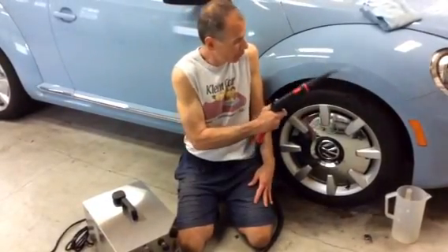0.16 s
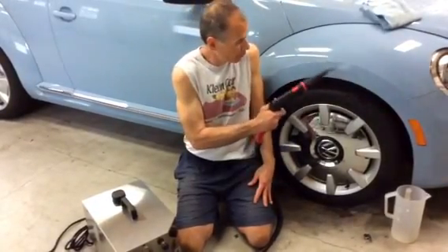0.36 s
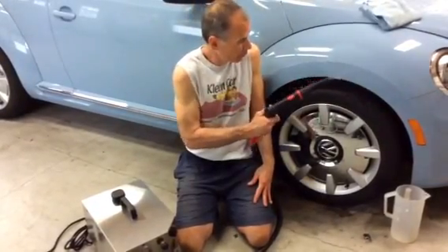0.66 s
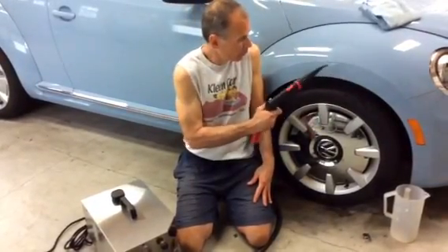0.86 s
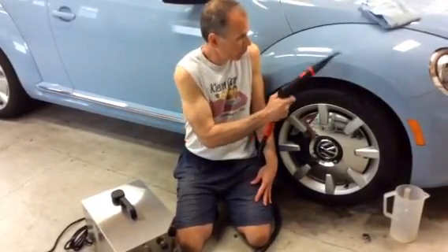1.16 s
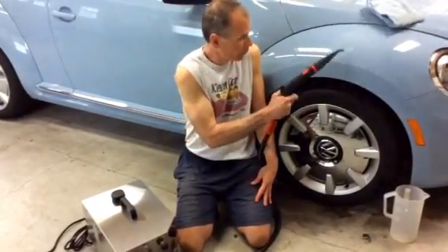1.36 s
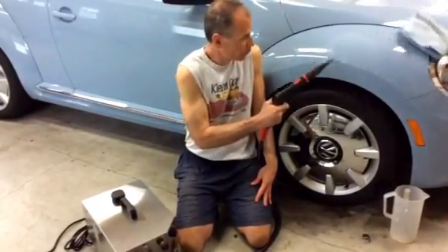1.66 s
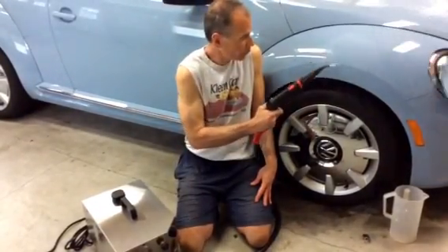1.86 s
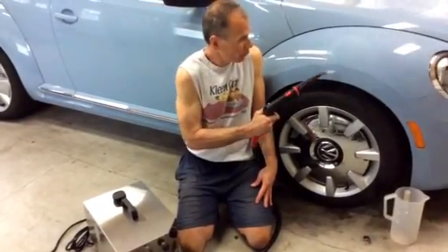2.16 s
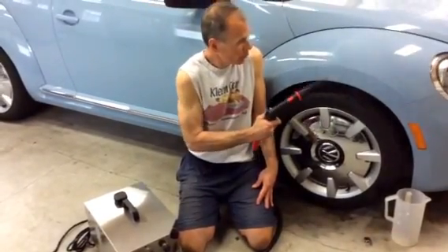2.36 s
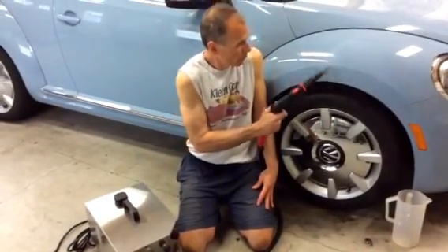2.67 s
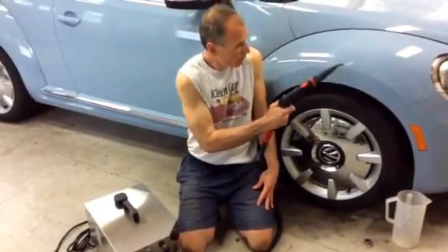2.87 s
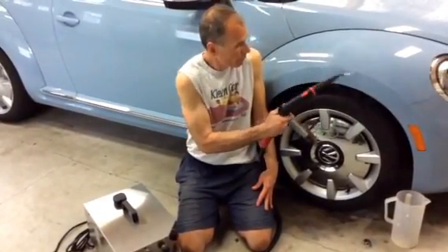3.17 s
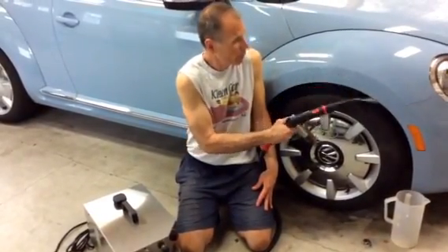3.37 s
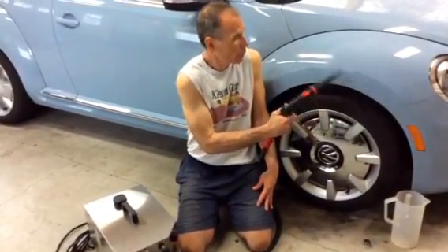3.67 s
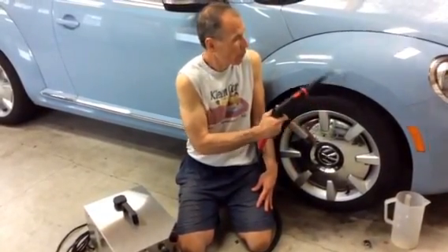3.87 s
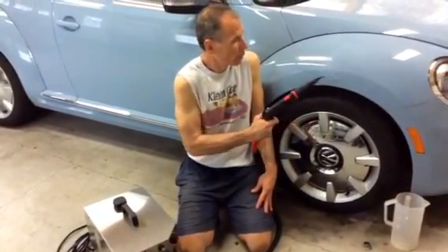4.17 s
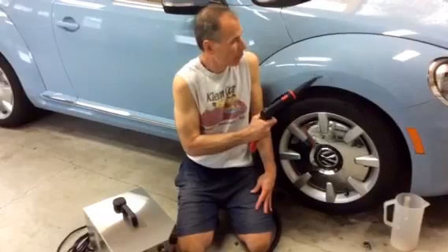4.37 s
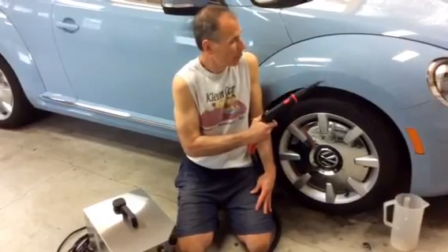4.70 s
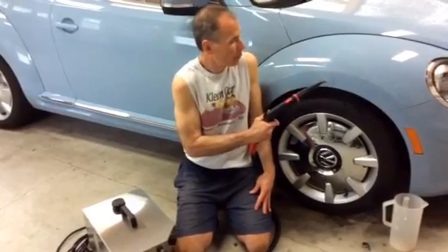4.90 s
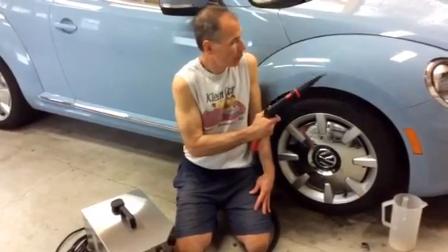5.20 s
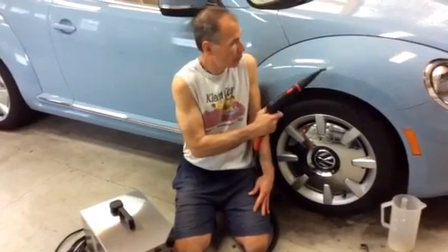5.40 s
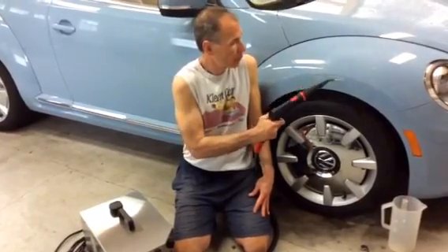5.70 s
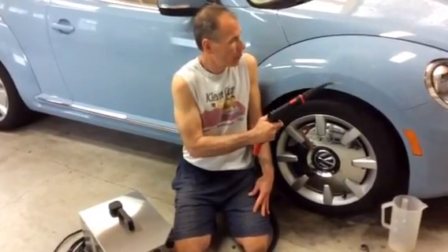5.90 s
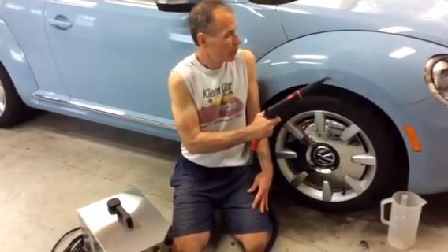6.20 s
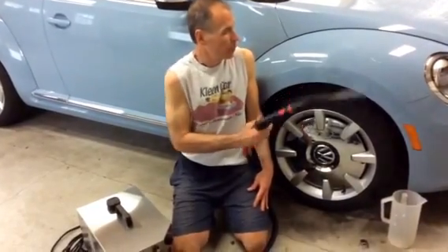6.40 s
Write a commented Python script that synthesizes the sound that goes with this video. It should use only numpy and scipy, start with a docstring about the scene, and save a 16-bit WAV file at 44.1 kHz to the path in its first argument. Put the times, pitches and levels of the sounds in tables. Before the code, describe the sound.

Continuous airy steam hiss, strongest in the treble, with a thinner roar beneath and slight fluttering sputter. It begins a little restrained, grows stronger around two seconds, then surges and dips irregularly. Draught buffets the close microphone with dull flutters and sharp low pops, sparse early and dense later. Small hard indoor workshop, short dull echoes, both channels alike; the jet is still hissing at the end.

```python
"""Steam wand in a workshop

A steam wand is waved over a car wing, and its jet hisses: noise in many bands that swells and ducks.
Some narrow bands stand out in the steam, near echoes add faint ripples, and the walls add a dull tail.
Its draught buffets the microphone: random small pressure jumps swell in gusts, and bigger ones stand out.
A quiet room tone lies underneath; both channels are alike."""
import sys
import numpy as np
from scipy import signal
from scipy.fft import rfft, irfft
from scipy.io import wavfile
from scipy.ndimage import map_coordinates

SR = 44100
rng = np.random.default_rng(int(sys.argv[2]) if len(sys.argv) > 2 else 0)


def to_wav(sig):
    """Store sig (one row per channel, or 1-D mono) as 16-bit WAV at the path in sys.argv[1].

    Samples outside -1..1 are clipped; the rate is SR.
    """
    pcm = np.clip(np.atleast_2d(sig), -1, 1) * 32767
    pcm = np.round(pcm).astype(np.int16)
    wavfile.write(sys.argv[1], SR, pcm.T)  # frames by channels


N = 288810

# Tone colour of the room's background noise: (f/Hz, relative level per Hz/dB)
ROOM_COLOUR = [(21, -42), (35, -27), (162, -14), (267, -10), (446, -11), (600, -18), (780, -29),
               (1320, -120)]
ROOM_TONE_DB = -66

# Walls: time for the echo to fade by 60 dB, and where its treble starts to fade
ECHO_FADE_S, WALL_CUT_HZ = 0.3, 2440
WALL_ECHO_DB = -12

# Changing draught on the microphone port beneath the gusts: (t/s, rumble level/dB)
DRAUGHT = [(0, -53), (0.18, -70), (0.45, -68), (0.85, -59), (1.07, -74), (1.28, -70), (1.38, -55),
           (1.85, -59.5), (1.97, -62), (2.3, -50), (2.9, -60), (3.1, -52.5), (3.45, -56), (3.7, -57),
           (4.0, -55), (4.12, -45), (4.45, -48), (4.7, -41), (5.28, -48), (5.38, -68), (5.48, -54),
           (5.68, -57), (6.0, -48), (6.4, -53), (6.55, -46)]
# Gusts on the port: (start t/s, held t/s, rumble level/dB)
GUSTS = [(0.52, 0.018, -56), (0.68, 0.028, -57), (0.77, 0.046, -50), (0.97, .03, -57), (1.7, 0.027, -48),
         (2.07, 0.065, -42), (2.3, .03, -43), (2.39, .36, -37), (2.86, .02, -50), (3.172, .012, -45.5),
         (3.235, 0.022, -44), (3.447, .015, -45), (3.51, 0.068, -37), (3.745, 0.024, -40),
         (3.845, 0.026, -39.5), (4.14, .09, -35.5), (4.295, .015, -40), (4.355, 0.065, -36.5),
         (4.56, .13, -39), (4.74, .11, -35.5), (4.94, 0.064, -34), (5.06, 0.025, -37.5),
         (5.185, .09, -40.5), (5.73, 0.068, -39.5), (5.85, .14, -35), (6.045, 0.066, -36),
         (6.16, 0.051, -38.5), (6.285, 0.058, -37.5), (6.485, 0.025, -40)]
GUST_RISE_DB_PER_S, GUST_FALL_DB_PER_S = 600, 600
# Pressure jumps that stand out, before the port leak:
# (t/s, peak level/dB, push +1 or pull -1, fade time constant/ms)
POPS = [(2.0999, -26, 1, 1.0), (2.3095, -20.5, 1, 2.2), (2.4508, -21, -1, 1.0), (2.456, -22.5, 1, 2.0),
        (2.5067, -22.5, 1, 1), (2.5653, -21, -1, 2.9), (2.638, -25, 1, 1.81), (2.728, -25, 1, 2.2),
        (2.737, -27, 1, 1.1), (3.176, -29, 1, 0.96), (3.243, -25.5, 1, 0.86), (3.2516, -29, 1, 0.6),
        (3.453, -32, 1, 1.1), (3.523, -23.5, 1, 0.39), (3.748, -22.5, 1, 1.8), (4.1454, -27, 1, 2),
        (4.1868, -14, 1, 1.3), (4.206, -22, -1, 0.69), (4.2969, -14, -1, 1.4), (4.301, -19, 1, 1.2),
        (4.385, -14, 1, 0.71), (4.3932, -23, -1, 1.1), (4.56, -26, 1, 0.67), (4.8032, -20, -1, 1.0),
        (4.8124, -18, 1, 1.4), (4.8267, -19, 1, 1.3), (4.844, -12, -1, 1.6), (4.8489, -13, 1, 0.94),
        (4.9487, -25, 1, 1.1), (4.9596, -19, 1, 1.7), (5.0731, -15, 1, 0.7), (5.084, -20.5, 1, 1.4),
        (5.1876, -28, 1, 0.65), (5.248, -21.5, -1, 1.8), (5.733, -23, -1, 0.9), (5.883, -20, -1, 1.1),
        (5.909, -17, 1, 1.1), (5.918, -21, 1, 1.5), (5.9244, -11.5, -1, 0.71), (5.949, -18, 1, 0.84),
        (5.964, -16, 1, 1.7), (5.984, -24, -1, 1.2), (6.0923, -20, 1, 1.4), (6.213, -21, 1, 0.81),
        (6.3197, -16, 1, 0.94), (6.3325, -21, 1, 1.1)]
# Small eddies: number per second over all sizes, strength spread, fade time constants of three sizes
EDDIES_PER_S, EDDY_SPREAD_DB, EDDY_FADES_MS = 260, 3, (0.88, 1.23, 3.1)
RISE_SHARE = 0.13    # rise time constant of a jump, as a share of its fade
PORT_LEAK_HZ = 56.6

# Slow swell of the steam: (t/s, hiss level/dB, roar level/dB, body level/dB)
JET_SWELL = [(0.0, -27, -38.5, -51), (0.3, -27, -34.5, -49), (0.85, -23.5, -33.5, -48.5),
             (0.98, -26, -33.5, -50.5), (1.2, -26.5, -33.5, -47), (1.42, -27, -35, -49),
             (1.58, -24.5, -33, -47), (1.7, -26, -34, -50.5), (1.88, -25, -32.5, -45.5),
             (2.13, -21.5, -31, -46), (2.45, -21, -31.5, -47.5), (2.73, -23, -33, -49.5),
             (3.05, -27.5, -34, -46.5), (3.2, -23, -31, -48), (3.45, -23, -31.5, -43),
             (3.72, -23.5, -32.5, -50), (3.88, -20.5, -30.5, -44.5), (4.18, -21.5, -31, -46),
             (4.5, -24, -35, -50.5), (4.62, -21, -31.5, -46.5), (4.81, -20, -30.5, -44),
             (4.9, -23.5, -33.5, -49.5), (5.09, -21.5, -34, -49.5), (5.5, -24.5, -35, -43.5),
             (5.76, -20.5, -30.5, -45.5), (6.05, -22.5, -33.5, -49.5), (6.55, -25, -36, -50)]
# Tone colour of the steam before its bands are levelled: (f/Hz, relative level per Hz/dB)
JET_COLOUR = [(210, -35), (350, -25), (430, -17.5), (565, -23.5), (750, -18), (1000, -15.5), (1400, -16),
              (2160, -12.5), (2680, -10), (4540, -3.5), (7800, 0), (10200, -2), (12200, -4), (15400, -7.5)]
# Borders between the four parts of the jet: body, roar, hiss and sizzle
BODY_TOP_HZ, ROAR_TOP_HZ, SIZZLE_FROM_HZ = 1900, 4200, 10000
# Sizzle: level against the mean hiss, and share of the hiss's slow swing
SIZZLE_UNDER_DB, SIZZLE_FOLLOWS = -5, 0.62
# Narrow bands that stand out in the steam, the lower ones like the ripple of a floor echo:
# (f/Hz, width f/Hz, boost level/dB)
STANDOUT_BANDS = [(1208, 25, 7), (1340, 40, 4), (1593, 50, 6), (1696, 18, 6), (1778, 18, 6), (2031, 50, 3),
                  (2207, 30, 6), (2407, 27, 4), (2960, 43, 4), (5170, 50, 2), (6288, 80, 3), (7720, 700, 2),
                  (9400, 350, 3)]
# The nozzle flicks away, with the full depth in the hiss:
# (start t/s, held t/s, climb t/s, depth level/dB)
FLICKS = [(1.865, .02, 0.059, 6), (2.142, 0.036, 0.078, 11.5), (3.255, 0.0092, 0.032, 4.5),
          (3.59, 0.0087, .06, 4.5), (3.88, .025, 0.16, 12), (5.515, .02, 0.13, 9.5)]
FLICK_FALL_S, SIZZLE_LATE_S, SIZZLE_CLIMB_MORE_S = 0.031, 0.011, 0.032
FLICK_ROAR_SHARE, FLICK_SIZZLE_SHARE, FLICK_DRAUGHT_SHARE = 0.37, 0.99, 0.8
FLICK_SWELL_DB, FLICK_SWELL_FADE_S = 2, 0.1    # roar and body swell as the treble climbs back
# The steam slackens (+) or surges (-) for a moment; hiss and sizzle take a share of the roar depth:
# (start t/s, held t/s, roar depth level/dB, body depth level/dB)
LULLS = [(0.035, .01, -3, 0), (0.13, 0.027, 3, 9), (0.21, .01, -2.5, -1), (0.475, 0.0087, -3, 0.5),
         (0.84, 0.0085, -2.5, -4.5), (2.02, .01, 0.5, -0.5), (2.74, 0.062, 4, 4), (2.86, 0.021, 2.5, 0),
         (2.97, 0.045, -4.5, -1), (3.5, 0.015, -1.5, -3.5), (5.1, 0.038, 4.5, 4), (5.22, .02, 0, 7),
         (5.3, 0.053, 5.5, 9), (5.42, .01, -1, 6.5), (5.99, 0.0085, 1, 0), (6.22, 0.014, 3, 10),
         (6.35, 0.072, 1.5, 3), (6.45, 0.018, -1.5, -0.5)]
LULL_FALL_S, LULL_RISE_S = 0.037, 0.067
LULL_HISS_SHARE, LULL_SIZZLE_SHARE = 0.78, 0.24
# Near echoes off wing and floor, sliding as the wand is waved:
# (mean delay t/ms, sway t/ms, sway rate f/Hz, level/dB)
BOUNCES = [(1.301, 0.14, 1.48, -15), (5.201, 0.078, 1.77, -15)]

# Narrow dips in the microphone's treble: (f/Hz, width f/Hz, change level/dB)
MIC_DIPS = [(6900, 450, -2), (8900, 400, -2), (11400, 350, -4), (13480, 300, -6), (14550, 500, -4)]
MIC_LOW_HZ, MIC_TOP_HZ = 35.2, 15290


def from_db(db):
    """Turn decibels into a gain."""
    return 10 ** (np.asarray(db) / 20)


def rms_one(x):
    """Scale a sound so that its average strength (rms) is 1."""
    return x / np.sqrt(np.mean(x ** 2) + 1e-20)


def in_time(rows):
    """Draw straight lines between the table's rows: one curve over all samples for each column."""
    s, *columns = np.transpose(rows)
    return [np.interp(np.arange(N) / SR, s, column) for column in columns]


def drift(rate):
    """Wander at random around 0 with spread 1, about rate turns a second."""
    # Worked out at every 20th sample; the first 4000 values let the filter settle
    r = np.exp(-np.pi * rate * 20 * 2 / SR)
    noise = rng.standard_normal(N // 20 + 4002)
    slow = signal.lfilter([1], [1, -2 * r, r * r], noise)[4000:]
    return np.interp(np.arange(N) / 20, np.arange(len(slow)), rms_one(slow))


def dips(s, fall_s, held_s, climb_s, db):
    """Add up brief losses in dB: each falls, is held, then climbs back."""
    t = np.arange(N) / SR
    total = np.zeros(N)
    for *times, depth in np.broadcast(s, fall_s, held_s, climb_s, db):
        total += np.interp(t, np.cumsum(times), [0, depth, depth, 0])
    return total


def coloured(spectrum):
    """Make steady noise whose strength at each pitch follows the table."""
    hz, db = np.transpose(spectrum)
    grid = np.arange(1, N // 2 + 2) * SR / N
    gain = from_db(np.interp(np.log(grid), np.log(hz), db))
    return irfft(rfft(rng.standard_normal(N)) * gain, N)


def band(x, low_hz, high_hz):
    """Keep mainly the sound between two frequencies."""
    return signal.sosfilt(signal.butter(2, [low_hz, high_hz], "band", fs=SR, output="sos"), x)


def high_pass(x, hz):
    """Weaken the bass below a frequency."""
    return signal.sosfilt(signal.butter(2, hz, "high", fs=SR, output="sos"), x)


def boost(x, hz, width_hz, db):
    """Lift or dent a narrow band by adding or taking away what a resonator rings with."""
    r = np.exp(-np.pi * width_hz / SR)
    feed = (1 - r * r) / 2 * np.array([1, 0, -1])
    ring = [1, -2 * r * np.cos(2 * np.pi * hz / SR), r * r]
    return x + (from_db(db) - 1) * signal.lfilter(feed, ring, x)


def room_tone():
    """Steady coloured noise as the quiet background of the room."""
    return from_db(ROOM_TONE_DB) * rms_one(coloured(ROOM_COLOUR))


def wall_echoes(x, waves_per_s):
    """Dense dull echoes from walls and cars; the wand is waved between two spots with their own echoes."""
    t = np.arange(SR) / SR
    fade = from_db(-60 * t / ECHO_FADE_S)
    tails = rng.standard_normal((2, SR)) * fade * (t > 0.008)    # the first echo needs time to return
    tails = signal.sosfilt(signal.butter(1, WALL_CUT_HZ, fs=SR, output="sos"), tails)
    spot = np.pi / 2 * drift(waves_per_s)
    sent = x * np.stack([np.cos(spot), np.sin(spot)])
    echoes = np.zeros(N)
    for part, tail in zip(sent, tails):
        echoes += signal.fftconvolve(part, tail / np.linalg.norm(tail))[:N]
    return echoes


def jump(clicks, fade_ms):
    """Turn clicks into pressure jumps: a quick rise, then the pressure bleeds away; height near 1."""
    t = np.arange(round(0.02 * SR)) / SR / (fade_ms / 1000)
    shape = np.exp(-t) - np.exp(-t / RISE_SHARE)
    return signal.fftconvolve(clicks, shape / shape.max())[:len(clicks)]


def draught_level():
    """Rumble level in dB: gusts rise out of the draught, hold and sink back; flicks take air away."""
    t = np.arange(N) / SR
    level_db, = in_time(DRAUGHT)
    for s, held, db in GUSTS:
        before = GUST_RISE_DB_PER_S * np.maximum(s - t, 0)
        after = GUST_FALL_DB_PER_S * np.maximum(t - s - held, 0)
        level_db = np.maximum(level_db, db - before - after)
    s, held, climb, db = np.transpose(FLICKS)
    return level_db - FLICK_DRAUGHT_SHARE * dips(s, FLICK_FALL_S, held, climb, db)


def eddies():
    """Eddies of three sizes cross the port at random, each a small push or pull."""
    strength = from_db(EDDY_SPREAD_DB * np.minimum(rng.exponential(1, N), 3))
    pushes = strength * rng.choice([-1, 1], N)
    born = rng.random(N) < EDDIES_PER_S / SR
    size = rng.integers(0, 3, N)
    return sum(jump(pushes * born * (size == k), ms) for k, ms in enumerate(EDDY_FADES_MS))


def pops():
    """Bigger pressure jumps at set moments."""
    out = np.zeros(N)
    click = np.eye(1, 900)[0]    # a single 1, then silence
    for s, db, push, ms in POPS:
        at = round(s * SR)
        out[at:at + 900] += push * from_db(db) * jump(click, ms)
    return out


def buffeting(lumpy_db):
    """Moving air presses on the port as eddies and pops; a leak drains the steady pressure."""
    rumble = rms_one(high_pass(eddies(), PORT_LEAK_HZ))
    level_db = draught_level() + lumpy_db * drift(6.1)
    return from_db(level_db) * rumble + high_pass(pops(), PORT_LEAK_HZ)


def bounced(x):
    """Direct sound plus near echoes; their sliding delays comb the hiss into faint moving ripples."""
    out = x.copy()
    for ms, sway_ms, rate, db in BOUNCES:
        read_at = np.arange(N) - (ms + sway_ms * drift(rate)) * SR / 1000
        out += from_db(db) * map_coordinates(x, [read_at], order=3)
    return out


def steam_levels():
    """Levels in dB of body, roar, hiss and sizzle: the slow swell, shaped by flicks and lulls."""
    hiss_db, roar_db, body_db = in_time(JET_SWELL)
    mean_db = hiss_db.mean()
    sizzle_db = mean_db + SIZZLE_UNDER_DB + SIZZLE_FOLLOWS * (hiss_db - mean_db)

    s, held, climb, db = np.transpose(FLICKS)
    flick = dips(s, FLICK_FALL_S, held, climb, db)
    late_flick = dips(s + SIZZLE_LATE_S, FLICK_FALL_S, held, climb + SIZZLE_CLIMB_MORE_S, db)
    # The same curve shape, added instead of taken away, makes a swell
    swell = dips(s + FLICK_FALL_S, climb, held, FLICK_SWELL_FADE_S, FLICK_SWELL_DB)

    s, held, db, body_depth_db = np.transpose(LULLS)
    lull = dips(s, LULL_FALL_S, held, LULL_RISE_S, db)
    body_lull = dips(s, LULL_FALL_S, held, LULL_RISE_S, body_depth_db)
    return (body_db + swell - body_lull,
            roar_db + swell - lull - FLICK_ROAR_SHARE * flick,
            hiss_db - flick - LULL_HISS_SHARE * lull,
            sizzle_db - FLICK_SIZZLE_SHARE * late_flick - LULL_SIZZLE_SHARE * lull)


def jet(sputter_db, spit_db, patchy_db):
    """Rushing steam as bands of noise; wet steam makes all sputter together, and each flickers alone."""
    noise = [coloured(JET_COLOUR), coloured(JET_COLOUR)]    # neighbouring bands get unrelated noise
    sputter = sputter_db * drift(15.5) + spit_db * drift(260)
    parts = np.zeros((4, N))
    edges = np.geomspace(300, 16500, num=19)    # bands about a third of an octave wide
    for k, (low, high) in enumerate(zip(edges, edges[1:])):
        middle = np.sqrt(low * high)
        part = np.searchsorted([BODY_TOP_HZ, ROAR_TOP_HZ, SIZZLE_FROM_HZ], middle)
        flicker = from_db(sputter + patchy_db * drift(8.1))
        parts[part] += band(noise[k % 2], low, high) * flicker
    steam = sum(from_db(db) * rms_one(part) for part, db in zip(parts, steam_levels()))
    for hz, width_hz, db in STANDOUT_BANDS:
        steam = boost(steam, hz, width_hz, db)
    return steam


def scene():
    """Add room tone, wall echoes, draught and jet, alike in both channels."""
    steam = bounced(jet(sputter_db=0.5, spit_db=1.02, patchy_db=1.0))
    echoes = from_db(WALL_ECHO_DB) * wall_echoes(steam, waves_per_s=1.34)
    mono = room_tone() + echoes + buffeting(lumpy_db=1.5) + steam
    return np.stack([mono, mono])


def record(dry):
    """The microphone loses the deepest bass and dips in the treble; the very top is cut steeply."""
    out = high_pass(dry, MIC_LOW_HZ)
    for hz, width_hz, db in MIC_DIPS:
        out = boost(out, hz, width_hz, db)
    return signal.sosfilt(signal.ellip(14, 0.5, 80, MIC_TOP_HZ, fs=SR, output="sos"), out)


dry = scene()
out = record(dry)
to_wav(out)
```